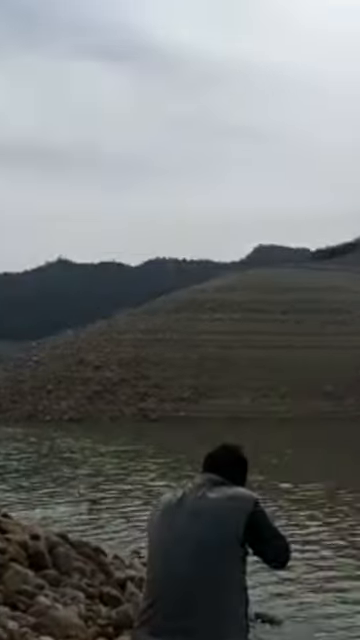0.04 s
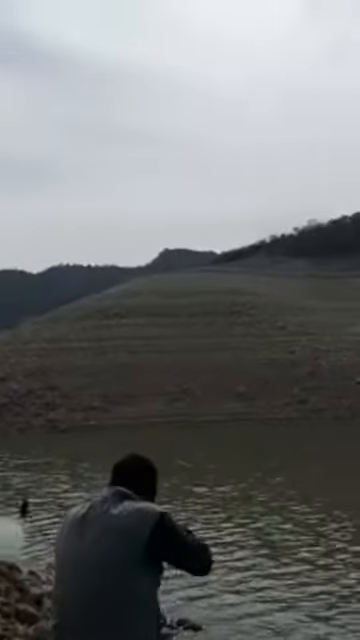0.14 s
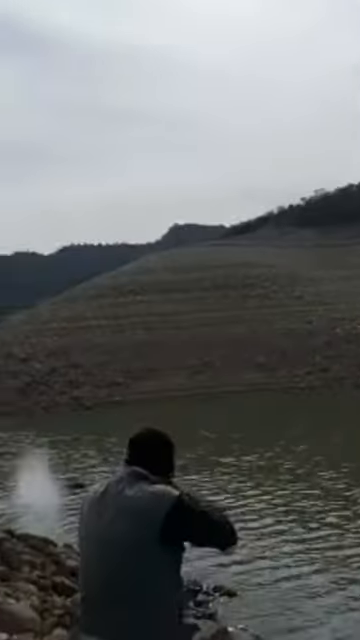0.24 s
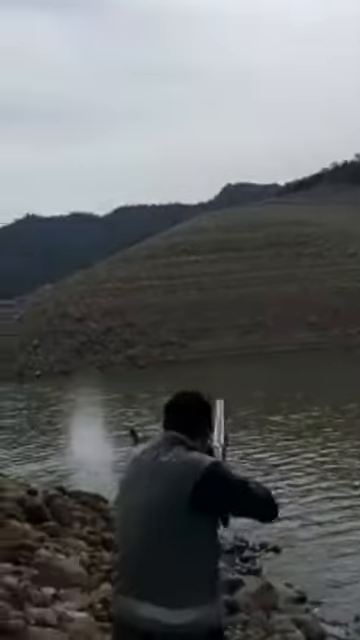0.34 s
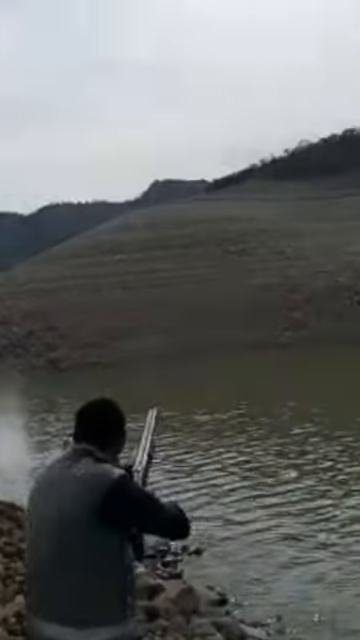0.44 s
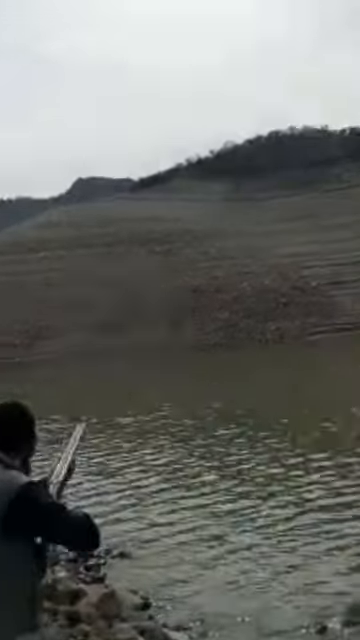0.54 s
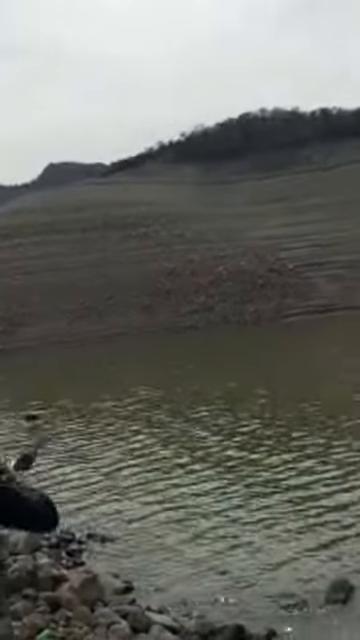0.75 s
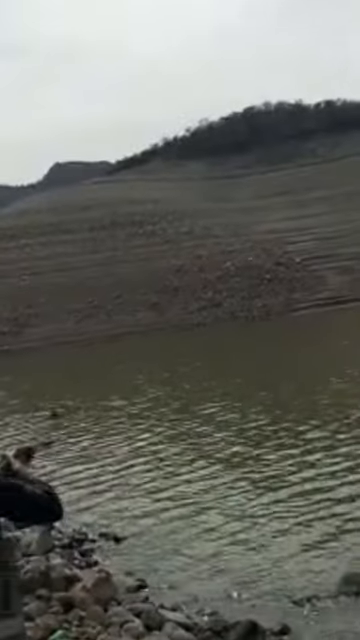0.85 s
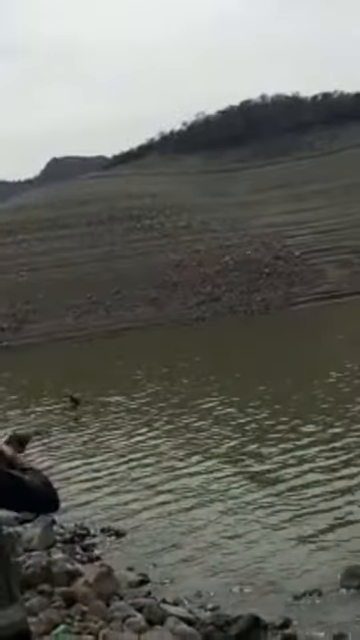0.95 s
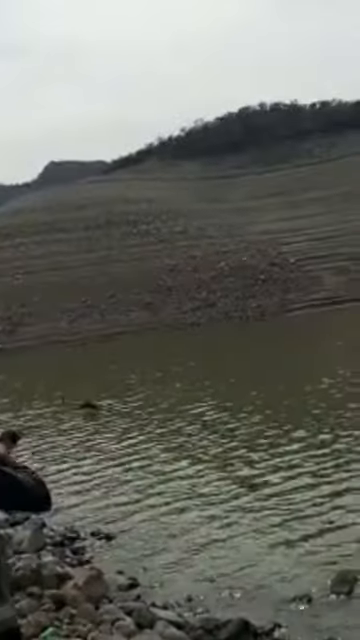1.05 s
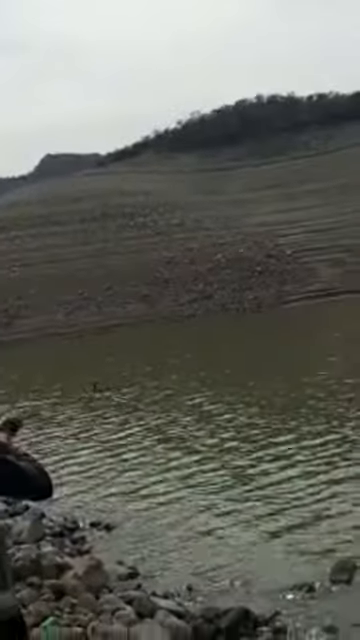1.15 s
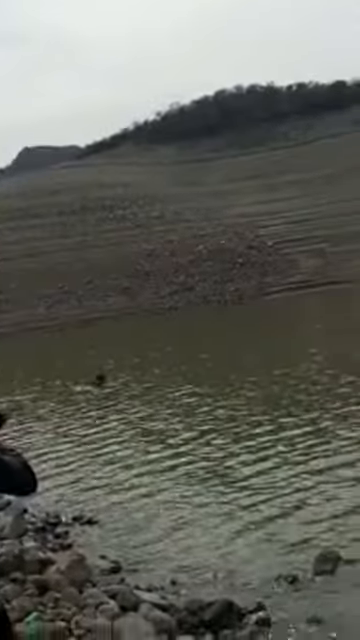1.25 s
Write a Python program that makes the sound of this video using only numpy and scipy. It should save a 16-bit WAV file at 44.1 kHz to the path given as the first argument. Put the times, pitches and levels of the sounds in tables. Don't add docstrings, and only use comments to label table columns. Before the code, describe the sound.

A shotgun blast cracks close by on a stony lake shore, then echoes off a hill

```python
import sys
import numpy as np
from scipy import signal
from scipy.io import wavfile
from scipy.ndimage import uniform_filter1d

SR = 44100
rng = np.random.default_rng(int(sys.argv[2]) if len(sys.argv) > 2 else 0)


def unload_wav(signal):
    wavfile.write(
        sys.argv[1],
        SR,
        np.round(np.clip(np.atleast_2d(signal).T, -1, 1) * 32767).astype(np.int16),
    )


def natural_amplitude(level_db):
    exponent = np.asarray(level_db, float) / 20
    return 10 ** exponent


N = 57330

# [f/Hz, level/dB]
CRACK_COLOUR = [(300, -7), (1300, -7), (2200, -9), (3200, -4), (5800, 0), (7000, -4), (8500, -20),
                (12500, -27), (15000, -17)]
BOOM_COLOUR = [(100, -14), (230, -3), (450, -2), (620, 1), (900, 0), (1400, -9), (2500, -20)]
DEEP_COLOUR = [(75, -14), (120, 0), (170, -5), (235, 2), (330, -8), (500, -22)]
RUMBLE_COLOUR = [(70, -20), (100, -7), (170, -4), (300, 0), (560, 0), (800, -6), (1100, -14), (2500, -32)]
# [f/Hz, level/dB]
SPLASH_COLOUR = [(300, -5), (1200, -5), (2200, -4), (5500, 0), (7000, -3), (9000, -22), (12500, -28),
                 (15000, -20)]
SPRAY_COLOUR = [(1500, -6), (3000, -6), (4600, -1), (6700, -4), (8500, -17), (12000, -24), (15000, -15)]
MIST_COLOUR = [(1500, -10), (3000, -12), (4600, -1), (6700, -4), (8000, -20), (10000, -32), (13000, -38),
               (15200, -32)]
WISP_COLOUR = [(6000, -8), (8500, 0), (11000, -10), (13000, -12), (14800, -2), (15500, -8)]
FIZZ_COLOUR = [(13500, -14), (14800, 0), (15500, -3)]
# [f/Hz, level/dB]
THUMP_COLOUR = [(60, -10), (100, 0), (300, -1), (576, 0), (870, -8), (1500, -11), (2100, -18)]
HILL_COLOUR = [(60, -16), (110, -5), (280, -3), (450, -8), (800, -5), (2000, -14), (4500, -14), (6500, -23)]
HILL_EDGE_COLOUR = [(2000, -12), (5000, 0), (7000, -8), (8500, -25), (10500, -39), (12000, -55)]
AIR_COLOUR = [(20, 0), (6500, 0), (9500, -19)]
# [f/Hz, level/dB]
TICK_COLOUR = [(200, 0), (6800, 0), (8500, -10), (12500, -12), (15200, -9)]
LAKE_COLOUR = [(300, -14), (560, -24), (850, -4), (2500, -4), (5000, -4), (7000, -8), (8500, -23),
               (15800, -40)]

# [start t/s, rise/s, hold/s, level/dB, fall/(dB/s), arrivals/(1/s)]
CRACK_SHAPE = (.2302, .0008, .027, -3.5, 680, 14000)
BOOM_SHAPE = (.230, .022, .038, -16, 3000, 4000)
DEEP_SHAPE = (.228, .024, .018, -16.5, 750, 1500)
AFTERBOOM_SHAPE = (.27, .035, .045, -28, 200, 4000)
RUMBLE_SHAPE = (.24, .02, .12, -35, 36, 1500)
# [start t/s, rise/s, hold/s, level/dB, fall/(dB/s), arrivals/(1/s)]
SPLASH_SHAPE = (.337, .037, .01, -19, 410, 16000)
SPRAY_SHAPE = (.25, .02, .055, -36, 140, 9000)
MIST_SHAPE = (.3, .02, .15, -51.5, 24, 9000)
WISP_SHAPE = (.97, .03, .02, -68, 250, 2500)
FIZZ_SHAPE = (.29, .06, .08, -58, 160, 4000)
# [start t/s, rise/s, hold/s, level/dB, fall/(dB/s), arrivals/(1/s)]
NEAR_BANK_SHAPE = (.95, .02, .08, -50, 30, 6000)
THUMP_SHAPE = (1.055, .006, .03, -25.5, 170, 4000)
HILL_SHAPE = (1.054, .009, .045, -28.5, 45, 12000)
HILL_EDGE_SHAPE = (1.052, .016, .04, -36, 120, 12000)

# [t/s, extra fall/(dB/s)]
CRACK_END = (.288, 1100)
# [start t/s, f/Hz, time to fall 60 dB/s, level/dB]
BARREL = (.43, 4550, .7, -47)
# [t/s, peak level/dB, f/Hz, time to fall 60 dB/s]
BOULDERS = [(.251, -8, 400, .04), (.261, -11, 240, .05), (.271, -6, 920, .04), (.279, -12, 560, .03),
            (.2855, -8, 680, .02), (.324, -23, 330, .06), (.297, -24, 150, .12), (.355, -25, 330, .09),
            (.44, -38, 270, .1), (.465, -34, 520, .06), (.515, -36, 320, .1), (.55, -38, 480, .08),
            (.93, -44, 600, .15), (.995, -44, 560, .15), (.76, -46, 155, .12), (.795, -48, 85, .2),
            (.87, -47, 135, .12), (.895, -45, 155, .1), (.95, -46, 135, .12), (1.005, -49, 88, .15)]
# [t/s, level/dB, fade/s]
SURGES = [
    (.348, 11, .009),
    (.359, 4, .006),
    (.370, 3, .008),
    (.385, 3, .005),
]
# [t/s, peak level/dB, f/Hz, time to fall 60 dB/s]
HILL_FACES = [(1.0635, -11, 480, .028), (1.065, -16, 280, .05), (1.0725, -11, 570, .025),
              (1.0875, -13, 650, .028), (1.087, -18, 400, .04), (1.092, -23, 130, .09),
              (1.094, -21, 960, .06), (1.0575, -27, 1400, .03), (1.058, -29, 2000, .025),
              (1.0655, -16, 660, .02), (1.122, -28, 1650, .05), (1.283, -33, 600, .05),
              (1.104, -21, 450, .05), (1.121, -19, 310, .09), (1.155, -27, 200, .09), (1.183, -28, 280, .1),
              (1.16, -29, 770, .06), (1.262, -29, 140, .08)]
# [t/s, peak level/dB, centre f/Hz, half width/octaves, time to fall 60 dB/s]
TICKS = [(.030, -46, 5000, .5, .02), (.034, -49, 4700, .1, .03), (.043, -42, 4500, .6, .015),
         (.043, -46, 330, .8, .04), (.066, -52, 2600, .2, .03), (.073, -54, 9000, .3, .02),
         (.112, -51, 2900, .15, .02), (.119, -53, 2300, .15, .02), (.122, -54, 1600, .15, .03),
         (.123, -53, 7500, .3, .02), (.186, -54, 3900, .15, .025), (.205, -44, 5000, .5, .03),
         (.2252, -27, 4500, .5, .011), (.2252, -29, 800, .8, .011), (.3482, -15, 5000, .6, .02),
         (.3595, -17, 3500, .7, .02), (.4026, -8, 5000, .45, .015), (.4104, -16, 4800, .4, .008),
         (.4178, -17, 4500, .5, .006), (.4314, -19, 4300, .35, .008), (.4362, -18, 5000, .4, .007),
         (.465, -36, 5200, .3, .05), (.4745, -25, 6200, .5, .025), (.497, -36, 7000, .8, .02),
         (.5004, -36, 6000, .8, .02), (.5392, -35, 3200, 1.1, .011), (.5704, -37, 7000, .6, .011),
         (.5756, -35, 6000, .8, .011), (.5834, -41, 3660, .1, .015), (.6095, -33, 6000, .6, .011),
         (.6164, -39, 4500, .5, .011), (.6594, -38, 4800, .35, .012), (.6943, -41, 6000, .6, .011),
         (.7044, -44, 6500, .7, .011), (.7582, -41, 5000, .5, .011), (.7866, -46, 4700, .2, .02),
         (.8031, -42, 6500, .6, .011), (.818, -51, 3600, .2, .04), (.8574, -39, 5500, .45, .014)]
# [t/s, half length/s, level/dB]
GUSTS = [
    (.05, .015, 8),
    (.072, .008, 8),
    (.137, .008, 6),
    (.203, .007, 10),
]
# [from t/s, to t/s, level/dB]
LAKE_HUSH = (.25, .93, -6)
# [start t/s, ramp/s, length/s, level/dB]
DUCK = (.213, .005, .0115, -6)


def blast():
    t = np.arange(N) / SR
    waterline_s, extra_fall = CRACK_END
    crack = scatter(CRACK_COLOUR, CRACK_SHAPE, 2., 1., 200)
    crack = crack * natural_amplitude(-extra_fall * np.maximum(t - waterline_s, 0))
    boom = scatter(BOOM_COLOUR, BOOM_SHAPE, 2., 1., 150)
    deep = scatter(DEEP_COLOUR, DEEP_SHAPE, 2., 1., 60)
    afterboom = scatter(RUMBLE_COLOUR, AFTERBOOM_SHAPE, 3., 2., 80)
    rumble = scatter(RUMBLE_COLOUR, RUMBLE_SHAPE, 3., 2., 60)
    return crack + boom + deep + afterboom + rumble + slaps(BOULDERS)


def barrel():
    start, hz, t60, db = BARREL
    t = np.maximum(np.arange(N) / SR - start, 0)
    tone = np.sin(2 * np.pi * hz * t + wander(60))
    return tone * natural_amplitude(db - 60 * t / t60 + 3. * wander(70)) * (t > 0)


def water():
    t = np.arange(N) / SR
    clumps_db = np.zeros(N)
    for s, db, fade in SURGES:
        clumps_db += db * np.exp(-np.maximum(t - s, 0) / fade) * (t > s)
    splash = scatter(SPLASH_COLOUR, SPLASH_SHAPE, 1.5, .6, 300) * natural_amplitude(clumps_db)
    spray = scatter(SPRAY_COLOUR, SPRAY_SHAPE, 2., 1.5, 40)
    mist = scatter(MIST_COLOUR, MIST_SHAPE, 3., 1.5, 80)
    wisp = scatter(WISP_COLOUR, WISP_SHAPE, 3., 2., 100)
    fizz = scatter(FIZZ_COLOUR, FIZZ_SHAPE, 2.5, 2.5, 90)
    return splash + spray + mist + wisp + fizz


def echo():
    near_bank = colour(scatter(HILL_COLOUR, NEAR_BANK_SHAPE, 2., 2., 30), AIR_COLOUR, False)
    thump = scatter(THUMP_COLOUR, THUMP_SHAPE, 1.5, 1.2, 120)
    wash = colour(scatter(HILL_COLOUR, HILL_SHAPE, 1.5, .6, 120), AIR_COLOUR, False)
    edge = scatter(HILL_EDGE_COLOUR, HILL_EDGE_SHAPE, 1.5, .8, 80)
    return slaps(HILL_FACES) + near_bank + thump + wash + edge


def ticks():
    out = np.zeros(N)
    t = np.arange(0, .05, 1 / SR)
    noise = rng.standard_normal((len(TICKS), len(t))) * np.minimum(t / .0003, 1)
    noise[:, :1] += 2.5
    for (s, db, hz, width, t60), puff in zip(TICKS, noise):
        wide = 2 ** np.clip(width, .05, 1.5)
        tick = band(puff * natural_amplitude(-60 * t / t60), hz / wide, hz * wide)
        add(out, s, natural_amplitude(db) * tick / abs(tick).max())
    return natural_amplitude(-1.5) * colour(out, TICK_COLOUR)


def lake():
    t = np.arange(N) / SR
    noise = colour(rng.standard_normal(N), LAKE_COLOUR)
    grid = signal.stft(noise, SR, nperseg=256)[2]
    patches = uniform_filter1d(rng.standard_normal(grid.shape), size=6, axis=0)
    patches = evened(uniform_filter1d(patches, size=5, axis=1))
    patch_db = 3.
    hiss = signal.istft(grid * natural_amplitude(patch_db * patches), SR, nperseg=256)[1][:N]
    a, b, hush_db = LAKE_HUSH
    hush = np.interp(t, [a - .03, a, b, b + .05], [0, hush_db, hush_db, 0])
    level_db, swell_db = -59, .6
    return hiss * natural_amplitude(level_db + hush + swell_db * wander(25))


def wind():
    t = np.arange(N) / SR
    level_db, centre_hz, gust_db = -59.5, 120, 2.5
    gusts = sum(db * np.exp(-((t - s) / half) ** 2) for s, half, db in GUSTS)
    air = evened(band(rng.standard_normal(N), centre_hz / 2, centre_hz * 2))
    return air * natural_amplitude(level_db + gusts + gust_db * wander(30))


def far_murmur():
    shape = (.3, .1, .9, -49, 1, 1200)
    return scatter(RUMBLE_COLOUR, shape, 3., 2., 60)


def scatter(points, shape, spread_db=3., lumpy_db=1.5, lumps_per_s=80):
    start, rise, hold, db, fall, per_s = shape
    t = np.arange(N) / SR - start
    chance, side, size = rng.random((3, N))
    sizes = natural_amplitude(-spread_db * np.log(np.maximum(size, .02)))
    hits = (chance < per_s / SR) * np.sign(side - .5) * sizes
    fade_db = fall * np.maximum(t - rise - hold, 0)
    lumps_db = lumpy_db * wander(lumps_per_s)
    env = np.clip(t / rise, 0, 1) ** 2 * natural_amplitude(db - fade_db + lumps_db)
    return colour(evened(hits) * env, points)


def slaps(rows):
    out = np.zeros(N)
    t = np.arange(0, .2, 1 / SR)
    for s, db, hz, t60 in rows:
        swell = np.minimum(t * hz, 1)
        fade = natural_amplitude(db - 60 * np.maximum(t - 1 / hz, 0) / t60)
        add(out, s, np.sin(2 * np.pi * hz * t) * swell * fade)
    return out


def wander(per_s):
    t = np.arange(N) / SR
    rates = np.geomspace(per_s / 5, per_s, 16)
    return evened(sum(np.sin(2 * np.pi * (f * t + rng.random())) / np.sqrt(f) for f in rates))


def colour(x, points, even=True):
    f, db = np.transpose(points)
    hz = np.fft.rfftfreq(4096, 1 / SR) + 1
    below = np.minimum(np.log2(hz / f[0]), 0)
    above = np.maximum(np.log2(hz / f[-1]), 0)
    gain_db = np.interp(np.log(hz), np.log(f), db) + 24 * below - 24 * above
    gain = np.maximum(gain_db, -100) * np.log(10) / 20
    full = np.concatenate([gain, gain[-2:0:-1]])
    taps = np.fft.ifft(np.exp(np.conj(signal.hilbert(full)))).real
    return signal.oaconvolve(x, taps / (np.linalg.norm(taps) if even else 1))[:N]


def band(x, low_hz, high_hz):
    sos = signal.butter(2, [low_hz, min(high_hz, 15000)], "band", fs=SR, output="sos")
    return signal.sosfilt(sos, x)


def evened(x):
    return x / np.sqrt(np.mean(x ** 2) + 1e-20)


def add(mix, s, sound):
    part = mix[round(s * SR):][:len(sound)]
    part += sound[:len(part)]


def scene():
    shot = blast() + barrel() + water() + echo()
    background = ticks() + lake() + wind() + far_murmur()
    return (shot + background)[None]


def top_cut(x):
    return signal.sosfilt(signal.butter(12, 15990, fs=SR, output="sos"), x)


def record(dry):
    low_cut_hz, ceiling_db, top_hz = 62, .1, 15600
    start, ramp, length, db = DUCK
    t = np.arange(N) / SR - start
    cut = signal.sosfilt(signal.butter(3, low_cut_hz, "high", fs=SR, output="sos"), dry)
    ducked = cut * natural_amplitude(db * np.clip(t / ramp, 0, 1) * (t < length))
    overloaded = ducked / (1 + abs(ducked / natural_amplitude(ceiling_db)) ** 4) ** .25
    edge = signal.firwin(255, top_hz, window=("kaiser", 9), fs=SR)
    limited = signal.oaconvolve(overloaded, edge[None], "same")
    mix = np.clip(limited, -1, 1)
    return top_cut(mix)


dry = scene()
out = record(dry)
unload_wav(out)
```